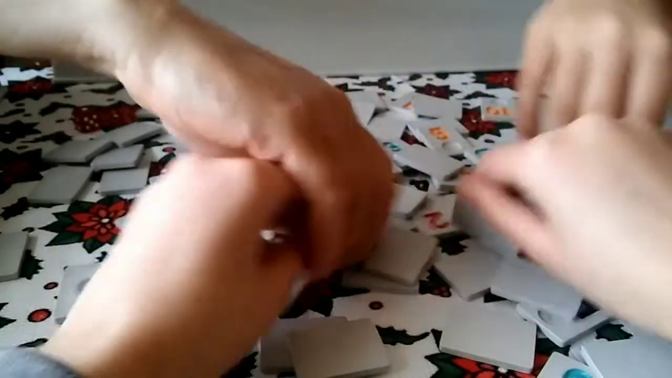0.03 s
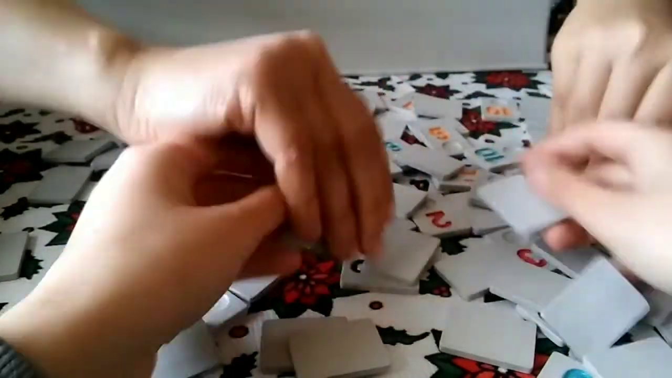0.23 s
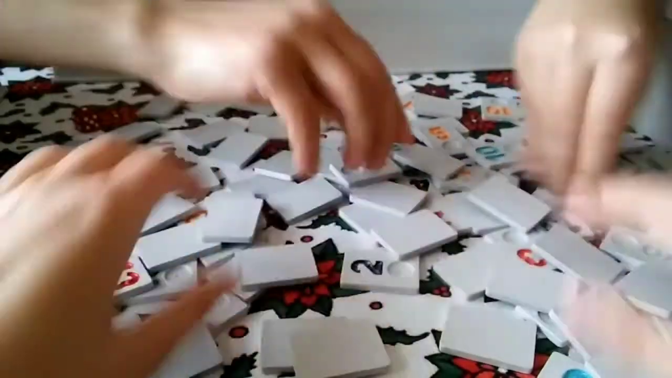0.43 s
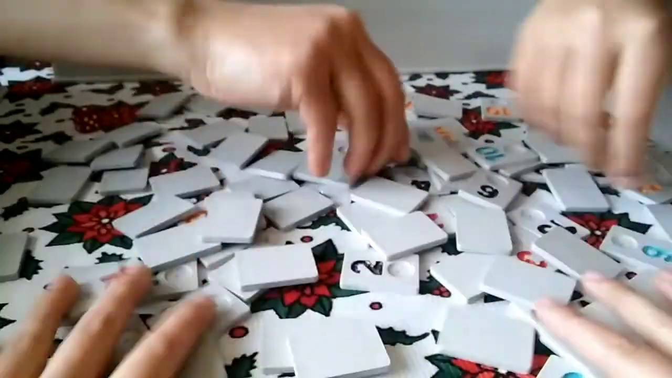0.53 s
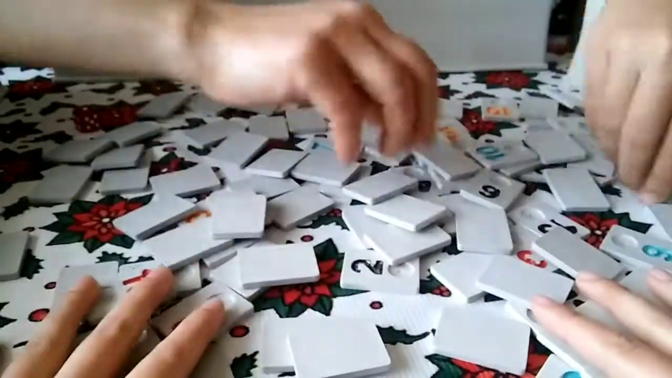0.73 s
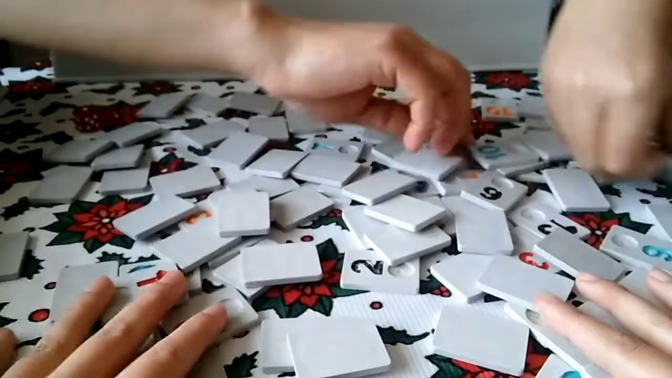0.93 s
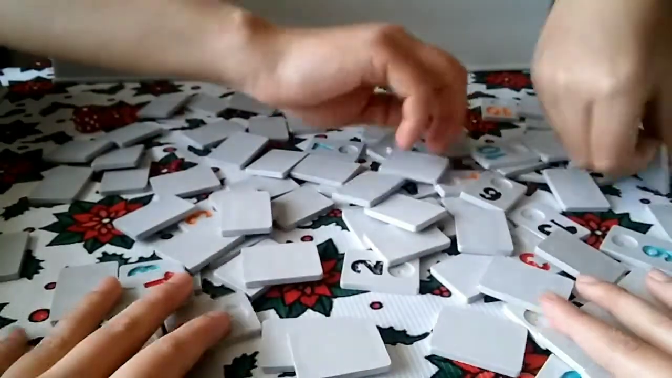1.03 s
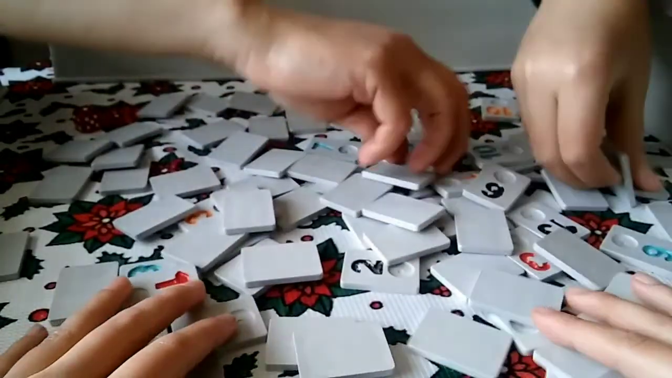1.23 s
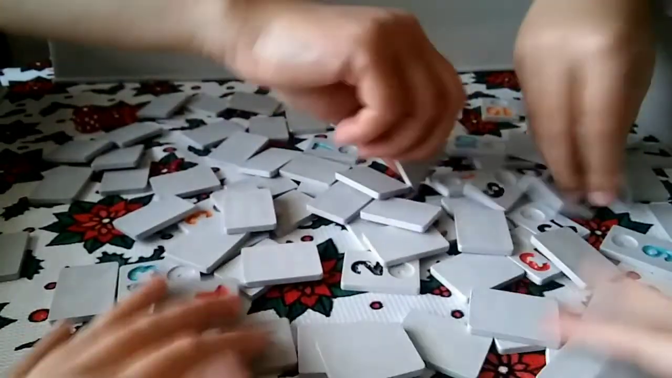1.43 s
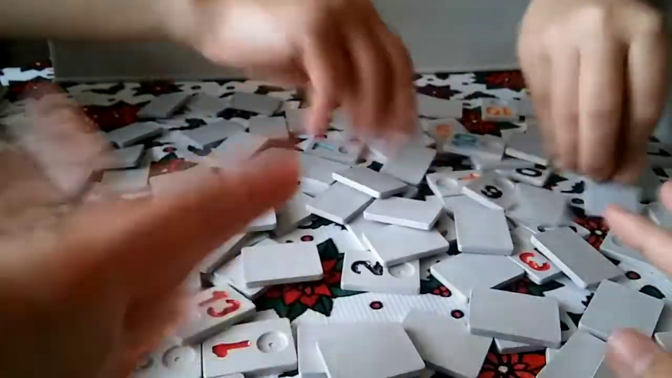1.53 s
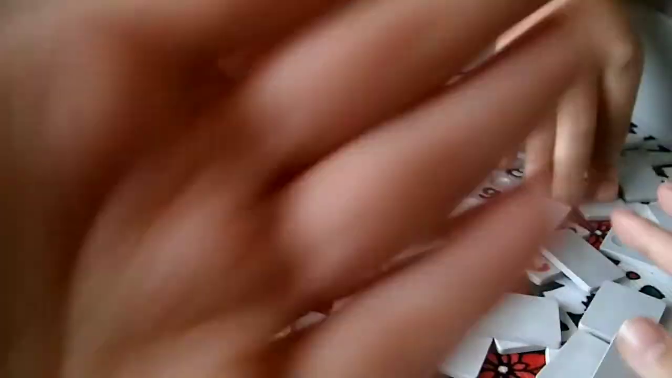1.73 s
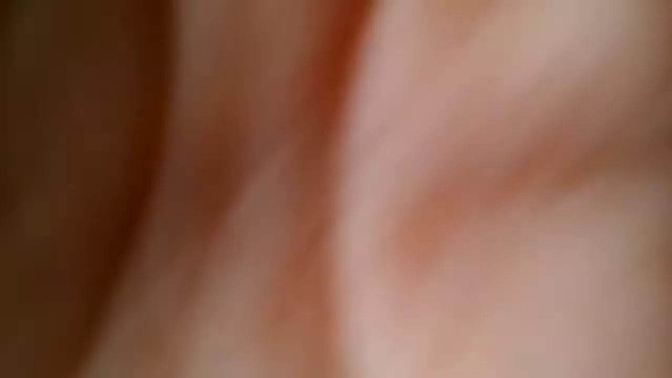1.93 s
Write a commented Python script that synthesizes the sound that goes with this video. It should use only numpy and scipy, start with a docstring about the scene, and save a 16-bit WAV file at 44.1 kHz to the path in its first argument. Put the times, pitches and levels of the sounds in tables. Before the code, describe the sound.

Game tiles being mixed by hand click and rattle close to the microphone in a small, quiet room. A busy flurry with one hollow knock gives way to lighter, scattered clicks, then a second burst with dull table thumps.

```python
"""Hard plastic game tiles clack together in short chattering bursts, close up, as several hands turn
and push them about on a cloth-covered table. Each clack is a quick run of touches that rings the tiles;
sliding tiles jostle in a finer rattle. Some knock the table top, which answers low, and one knock
rings hollow. A short, dull room tail and a low hush sit behind it all."""
import sys
import numpy as np
from scipy import signal
from scipy.fft import rfft, irfft
from scipy.io import wavfile

SR = 44100
rng = np.random.default_rng(int(sys.argv[2]) if len(sys.argv) > 2 else 0)


def transcribe(u):
    """Save the signal u as a 16-bit wav file named by the first command-line argument.

    u: samples, shape (n,) or (channels, n), limited to [-1, 1]; the rate is SR.
    q: integer samples, one column per channel.
    """
    v = np.clip(np.atleast_2d(u).T, -1, 1)
    q = np.round(v * 32767).astype(np.int16)
    wavfile.write(sys.argv[1], SR, q)


N = 88200

# Tile hitting tile. Each row: start in seconds, level in dB, brightness in dB.
CLACK_HITS = [(0.1341, -7, 4), (0.171, -17.5, -15), (0.181, -14.5, 3), (0.2184, 1.5, 4.5),
              (0.2714, -6.5, -1), (0.2788, -3.5, 0), (0.3031, -16, -2), (0.3231, -11, -2), (0.3379, -2, 10),
              (0.3499, 2.5, 13.5), (0.3545, 3, 6), (0.362, -3.5, 4.5), (0.3754, -6.5, -6),
              (0.3887, 6.5, -3.5), (0.3977, 1.5, 16), (0.4234, -7.5, -1), (0.4462, -6.5, 16.5),
              (0.4891, -3, 0), (0.5211, -10, -10.5), (0.5487, -8, -8.5), (0.5721, -4, 11),
              (0.586, -1.5, 15), (0.592, -3, -6), (0.6118, -4.5, 2), (0.622, -11, -13), (0.641, -11.5, 11),
              (0.653, -8.5, 0), (0.6912, -4.5, -7.5), (0.7109, -1, 11.5), (0.7836, -18, 15.5),
              (0.8005, -23, 15.5), (0.8761, -5, 5), (0.891, -20.5, 0), (0.9063, -17, -7), (0.928, -19, -12),
              (0.957, -9, -3), (0.962, -7.5, -3), (0.977, -17, 7), (1.036, -8, -6), (1.063, -18.5, -10),
              (1.224, -13, 12), (1.2408, -7, 7), (1.257, -11.5, -12.5), (1.288, -22, -14.5),
              (1.4110, -13.5, 14), (1.4447, -17.5, 6.5), (1.4654, -22, -16), (1.487, -17.5, -2),
              (1.493, -12.5, 4), (1.515, -17.5, -9.5), (1.5368, -12.5, -7), (1.5457, -11.5, 12),
              (1.57, -18.5, -13), (1.5908, 5, -2), (1.6127, -0.5, -3), (1.6626, -8, 5), (1.727, -3.5, 9),
              (1.7464, -16, 1.5), (1.9188, -17, -19.5)]
# The ring of one tile. Each row: pitch in Hz, level in dB, time to die away by 60 dB in seconds.
TILE_MODES = [(2890, -11, 0.00096), (3586, 2.5, 0.013), (4110, 12, 0.0029), (4960, -18.5, 0.017),
              (5560, -3, 0.0049), (6193, -2.5, 0.014), (8390, -7.5, 0.016), (9720, 5.5, 0.0055),
              (12200, -1, 0.002)]
# Tiles sliding and jostling. Each row: start in seconds, length in seconds, level in dB.
TILE_SLIDES = [(0.082, 0.12, -46), (0.2, 0.074, -64), (0.333, 0.077, -31.5), (0.433, 0.031, -30),
               (0.48, .17, -36), (0.666, 0.081, -35), (0.779, 0.082, -47.5), (0.877, 0.066, -39.5),
               (1.003, 0.059, -50.5), (1.082, 0.057, -55.5), (1.224, 0.078, -41.5), (1.346, 0.06, -48.5),
               (1.405, 0.071, -49.5), (1.483, 0.11, -41), (1.61, 0.042, -35.5), (1.684, 0.059, -44),
               (1.727, 0.043, -35), (1.894, 0.034, -51.5)]
# Tile or hand on the table top. Each row: start in seconds, level in dB, hardness in dB per octave.
TABLE_KNOCKS = [(0.234, -25.5, 2), (0.339, -28, -2), (0.35, -22.5, 6), (0.426, -27, 5.5), (0.508, -20, 3),
                (0.623, -23.5, -0.5), (0.681, -25, 6), (1.04, -27.5, 1.5), (1.228, -33.5, 0.5),
                (1.514, -30.5, -2.5), (1.591, -42, 17.5), (1.61, -21.5, 4), (1.692, -24.5, -4.5),
                (1.727, -17.5, 5), (1.735, -10.5, 2)]
# The ring of the table top. Each row: pitch in Hz, level in dB, time to die away by 60 dB in seconds.
TABLE_MODES = [(112.5, -21, 0.089), (212, -15.5, 0.08), (238.5, -11.5, 0.1), (329, -11.5, 0.034),
               (507, -7.5, 0.017), (739, -10.5, 0.047), (878, -5, 0.014), (1260, -2.5, 0.0081),
               (1854, -3.5, 0.0079), (2670, -17, 0.017)]
# The tone of the quiet room. Each row: frequency in Hz, relative level in dB.
HUSH_SPECTRUM = [(18, -53.5), (30, -5), (240, -0.5), (473, -19), (3690, -28.5), (12000, -46), (15600, -76),
                 (22000, -120)]

CHATTER_S, CHATTER_FADE_DB = 0.0043, 7   # length of a firm clack; fade across a run of touches
SOFT_LONGER = .2   # light clacks drag on: dB of length per dB weaker
LOW_RING_HZ, HIGH_RING_HZ = 4400, 7800   # a tile's low rings lie below the first, high above the second
CLACK_LOW_DB, CLACK_HIGH_DB, RATTLE_LOW_DB, RATTLE_HIGH_DB = -22, -20, -8.5, -12   # trims on those rings
TILE_COUNT, TILE_DETUNE = 5, 0.035   # tiles lie and are held differently: share of pitch either way
TILE_COLOUR_DB, MODE_SPREAD_DB, TOUCH_SPREAD_DB = 2.5, 2.5, 1.5   # random spread of strength
CONTACT_CUT_HZ = 7660   # soft contact dulls all but the high rings
RATTLE_PER_S, RATTLE_UNEVEN_DB, LUMPS_PER_S, LUMP_DB = 1100, 3, 110, 4.5
SLIDE_EDGE_S, SLIDE_FADE_DB, TABLE_SHUFFLE_DB = 0.0085, 2.5, -10   # a slide loses force as it goes
FIRM_SLIDE_DB, BRIGHTEN = -37.5, .7   # firmer slides are brighter: dB per dB above this level
KNOCK_LENGTH_S, PUSH_BELOW_HZ = 0.00714, 400


def clacks():
    """Tile strikes tile in a short chatter; bright hits trade low ring for high ring."""
    start, db, bright_db = np.transpose(CLACK_HITS)[:, :, None]
    along, sizes = chatter(len(start), count=16)
    stretch = amp(-SOFT_LONGER * np.minimum(db, 0))
    times = start + along * CHATTER_S * stretch
    return tile_rings(times, sizes * amp(db), CLACK_LOW_DB - bright_db, CLACK_HIGH_DB + bright_db)


def chatter(events, count, rise_share=0.33):
    """A run of touches swells and fades: gives each touch's place in the run (0 to 1) and signed size."""
    along = rng.random((events, count))
    swell = np.minimum(1, along / rise_share)
    db = TOUCH_SPREAD_DB * rng.standard_normal(along.shape) - CHATTER_FADE_DB * along
    return along, swell * amp(db) * rng.choice([-1, 1], along.shape) / np.sqrt(count)


def tile_rings(times, sizes, low_db, high_db):
    """Each row of touches lands on one of five detuned tiles and rings every mode at its own strength."""
    body, bright = np.zeros((2, N))
    tile = rng.integers(0, TILE_COUNT, (len(times), 1))
    for hz, db, t60 in TILE_MODES:
        trim_db = low_db if hz < LOW_RING_HZ else high_db if hz > HIGH_RING_HZ else 0
        colour_db = TILE_COLOUR_DB * rng.standard_normal(tile.shape)
        touch_db = MODE_SPREAD_DB * rng.standard_normal(times.shape)
        struck = sizes * amp(db + trim_db + colour_db + touch_db)
        layer = bright if hz > HIGH_RING_HZ else body
        for k, detune in enumerate(np.linspace(-TILE_DETUNE, TILE_DETUNE, TILE_COUNT)):
            layer += ring(clicks(times, struck * (tile == k)), hz * (1 + detune), t60)
    return bright + rolloff(body, 4, CONTACT_CUT_HZ)


def rattle():
    """Sliding tiles jostle in dense, lumpy little touches that ring the tiles and, faintly, the table."""
    times = rng.uniform(0, N / SR, 12000)
    touching = rng.random(len(times)) < RATTLE_PER_S * N / SR / len(times)
    lumps_db = LUMP_DB * np.interp(times * LUMPS_PER_S, np.arange(600), rng.standard_normal(600))
    accent_db = RATTLE_UNEVEN_DB * np.minimum(rng.exponential(1, len(times)), 3)
    sizes = touching * amp(lumps_db + accent_db) * rng.choice([-1, 1], len(times))
    start, length, db = np.transpose(TILE_SLIDES)[:, :, None]
    elapsed = times - start
    gate = np.clip(np.minimum(elapsed, length - elapsed) / SLIDE_EDGE_S, 0, 1)
    sizes *= np.sum(gate * amp(db - SLIDE_FADE_DB * elapsed / length), axis=0)
    bright_db = np.sum((gate > 0) * BRIGHTEN * (db - FIRM_SLIDE_DB), axis=0)[:, None]
    shuffle = np.zeros(N)
    for hz, mode_db, t60 in TABLE_MODES:
        nudges = clicks(times, sizes * rng.standard_normal(len(times)))
        shuffle += amp(mode_db) * ring(nudges, hz, t60)
    low_db, high_db = RATTLE_LOW_DB - bright_db / 2, RATTLE_HIGH_DB + bright_db
    return tile_rings(times[:, None], sizes[:, None], low_db, high_db) + amp(TABLE_SHUFFLE_DB) * shuffle


def knocks():
    """Blows on the table top: harder ones reach the higher modes; the low modes feel each as one push."""
    start, db, hardness = np.transpose(TABLE_KNOCKS)[:, :, None]
    along, sizes = chatter(len(start), count=6)
    table = np.zeros(N)
    for hz, mode_db, t60 in TABLE_MODES:
        tilt_db = hardness * np.log2(max(hz, 200) / 500)
        touch_db = MODE_SPREAD_DB * rng.standard_normal(along.shape)
        struck = np.abs(sizes) * amp(db + mode_db + tilt_db + touch_db)
        spread = along if hz > PUSH_BELOW_HZ else along / 8
        table += ring(clicks(start + spread * KNOCK_LENGTH_S, struck), hz, t60)
    return table


def hollow_knock(start_s=0.686):
    """One knock rings on two clear, hollow tones."""
    blow = clicks(start_s, 1.)
    return amp(-23) * ring(blow, hz=725, t60=0.072) + amp(-21.5) * ring(blow, hz=1297, t60=0.068)


def room_tail(x, t60=0.16, level_db=-16, cut_hz=6800):
    """The room answers with a short, dull, diffuse tail, 3 ms behind the sound."""
    t = np.arange(SR // 2) / SR
    tail = rng.standard_normal(len(t)) * amp(-60 * t / t60) * (t > .003)
    tail = rolloff(tail, 1, cut_hz)
    return amp(level_db) * signal.fftconvolve(x, tail / np.sqrt(np.sum(tail ** 2)))[:N]


def hush(level_db=-52):
    """A steady bed of room noise, mostly low."""
    hz, db = np.transpose(HUSH_SPECTRUM)
    bin_hz = np.arange(1, N // 2 + 2) * SR / N
    shape = amp(np.interp(np.log(bin_hz), np.log(hz), db))
    return amp(level_db) * unit_rms(irfft(rfft(rng.standard_normal(N)) * shape, N))


def split_treble(mid, above_hz=5800, side_db=-24):
    """Smeared treble, added to the left channel and taken from the right, makes the two channels differ
    slightly at the top."""
    smear = unit_rms(rng.standard_normal(256)) / 16   # unit energy
    smeared = np.convolve(mid, smear)
    side = rolloff(np.diff(smeared)[:N], 6, above_hz, "high")
    return mid + amp(side_db) * side * [[1], [-1]]


def ring(hits, hz, t60):
    """One mode: a unit click starts a dying sine of height about 1, with little sound off its pitch."""
    decay, angle = amp(-60 / (t60 * SR)), 2 * np.pi * hz / SR
    return signal.lfilter([.5, 0, -.5], [1, -2 * decay * np.cos(angle), decay * decay], hits + 1e-18)


def clicks(times, sizes):
    """A track of clicks of the given sizes at times in seconds."""
    return np.bincount(np.clip((np.ravel(times) * SR).astype(int), 0, N - 1), np.ravel(sizes), N)


def rolloff(x, order, hz, kind="low"):
    """A smooth low-pass or high-pass."""
    return signal.sosfilt(signal.butter(order, hz, kind, fs=SR, output="sos"), x)


def amp(db):
    """Decibels to gain."""
    return 10 ** (np.asarray(db) / 20)


def unit_rms(x):
    """Scale to an rms of one."""
    return x / np.sqrt(np.mean(x ** 2) + 1e-20)


def scene():
    """Tiles and table sit close and centred, the room behind them; the two channels differ slightly in the
    treble."""
    near = clacks() + rattle() + knocks() + hollow_knock()
    near = rolloff(near, 2, hz=58, kind="high")   # the small microphone loses the deepest part of a knock
    return split_treble(near + room_tail(near) + hush())


def record(dry):
    """Peaks clip at full scale, then a steep filter takes off the very top."""
    top_cut = signal.cheby2(16, 80, 16500, fs=SR, output="sos")
    return signal.sosfilt(top_cut, np.clip(dry, -1, 1))


dry = scene()
out = record(dry)
transcribe(out)
```